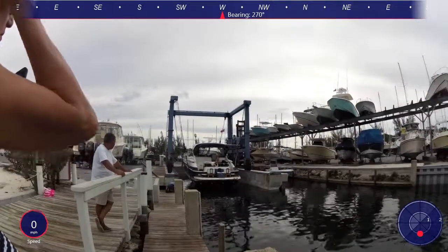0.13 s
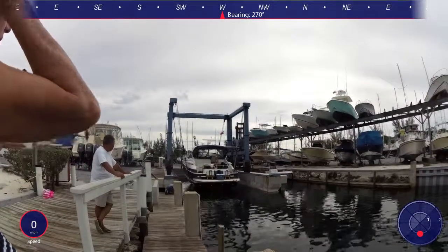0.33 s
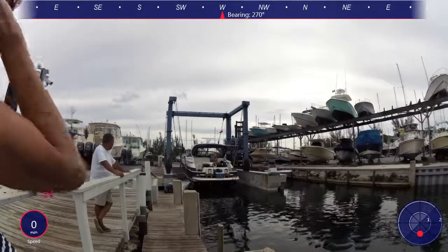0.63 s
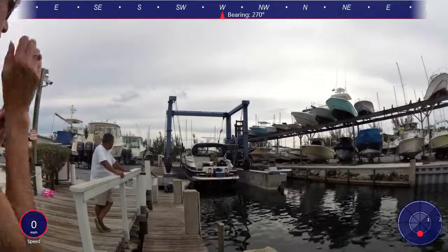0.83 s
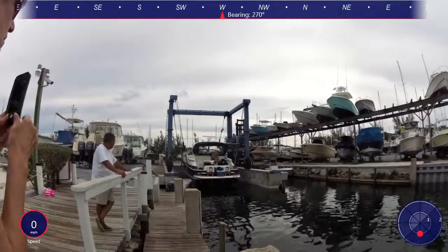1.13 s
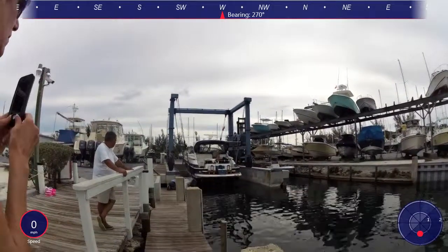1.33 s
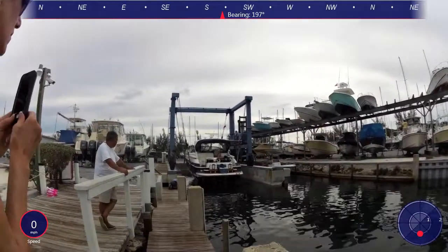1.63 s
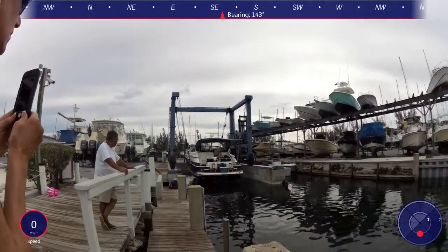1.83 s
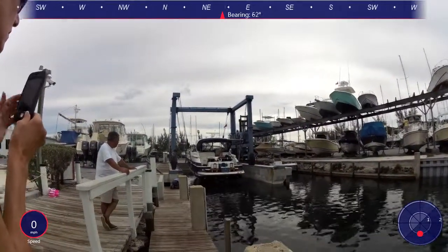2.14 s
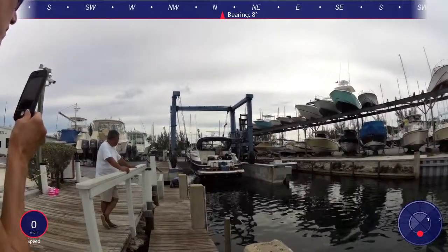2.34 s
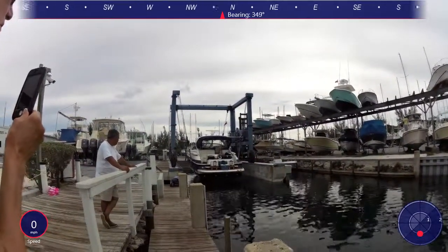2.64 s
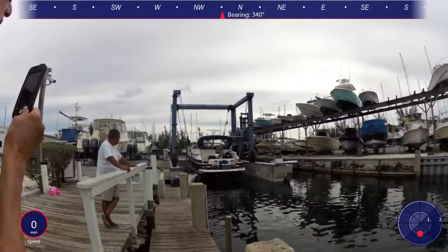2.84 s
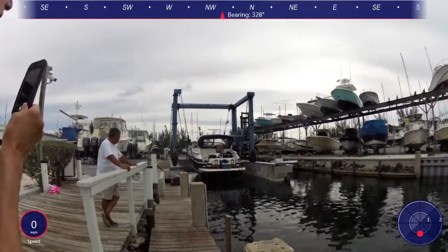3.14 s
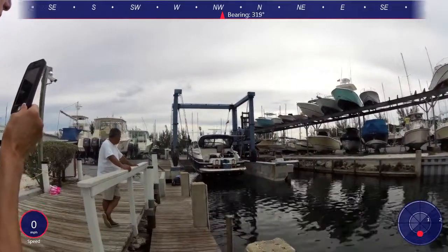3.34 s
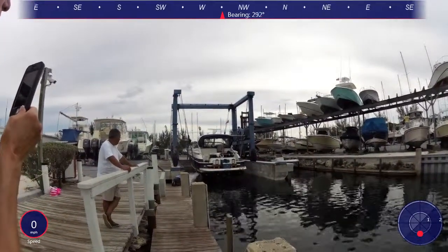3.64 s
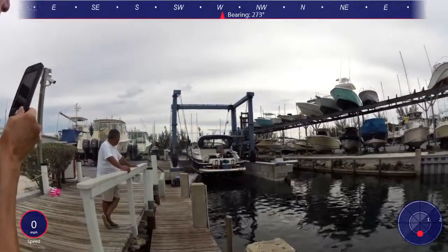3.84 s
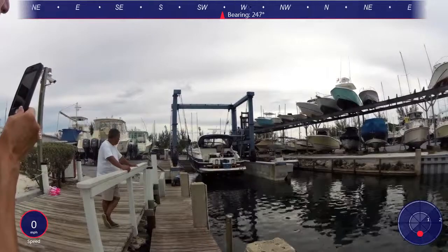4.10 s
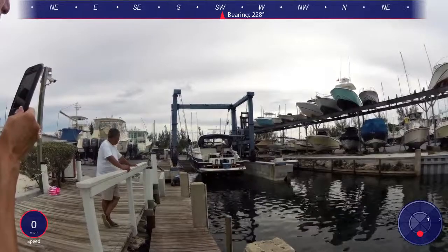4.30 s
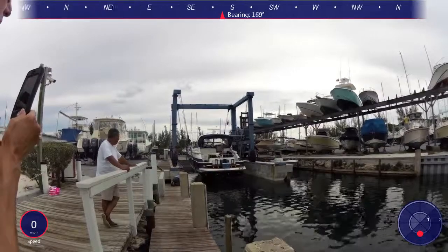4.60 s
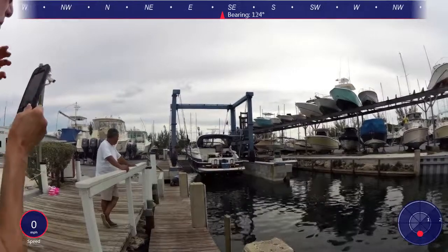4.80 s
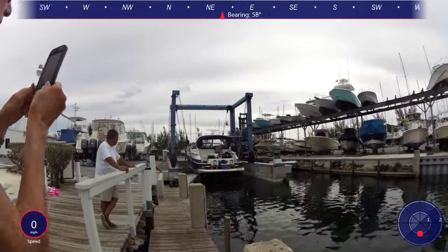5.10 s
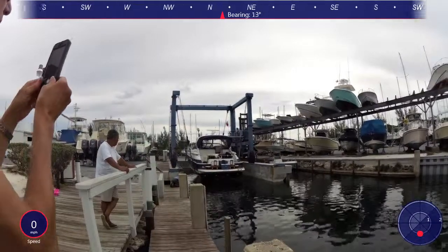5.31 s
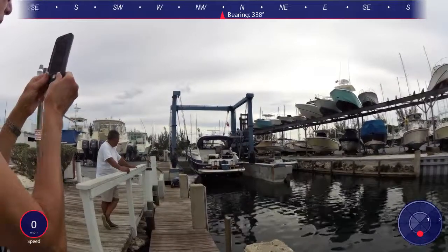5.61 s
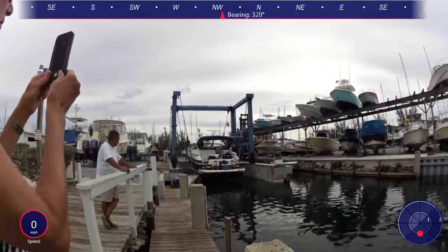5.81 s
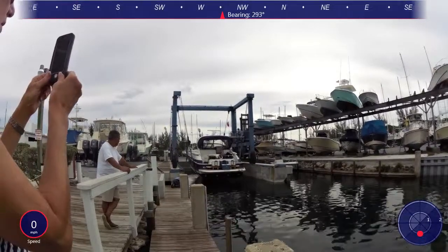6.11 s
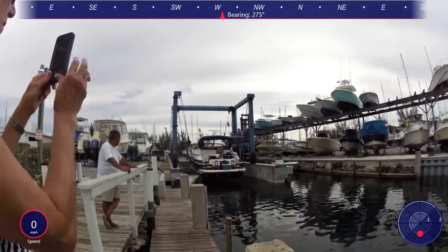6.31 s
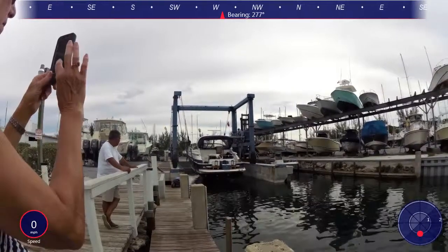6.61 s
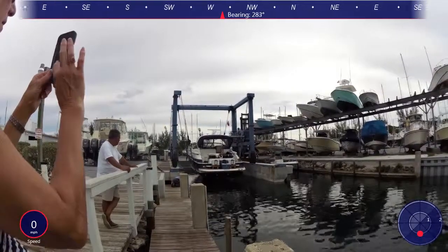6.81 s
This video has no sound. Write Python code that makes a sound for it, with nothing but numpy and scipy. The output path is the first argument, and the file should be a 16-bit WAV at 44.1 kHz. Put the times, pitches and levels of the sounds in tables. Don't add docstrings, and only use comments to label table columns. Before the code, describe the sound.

From 0 to about 7 seconds a boat lift idles continuously in an open boatyard. A four-cylinder diesel gives a low, slightly rough hum, rising gently over the first couple of seconds. Above it a hydraulic pump and its motor whine near 445 and 890 hertz, their close pitches beating slowly, roughly once a second. A broad midrange roar, clatter and quieter hiss pulse faintly with the engine and waver in moving air. Around 1.6 to 2.3 seconds dull frame knocks and panel rattles come through, strongest near 1.9. Near 2.7 the whine's balance shifts subtly. Thin pipe tones swell at 3.2 to 4 and later; the upper whine eases around 4.3. More small knocks fall at 4.4 to 5.8, with a firmer one near 5.8 and another at 6.6. The hiss grows slightly towards the end. Mono, limited bass, softened top, nearly constant level.

```python
import sys
import numpy as np
from scipy import signal
from scipy.fft import rfft, irfft
from scipy.io import wavfile
from scipy.ndimage import uniform_filter1d, map_coordinates

SR = 44100
rng = np.random.default_rng(int(sys.argv[2]) if len(sys.argv) > 2 else 0)


def invert_db(x):
    u = np.asarray(x, float) / 20
    return 10 ** u


def unload_wav(signal):
    wavfile.write(
        sys.argv[1],
        SR,
        np.round(np.clip(np.atleast_2d(signal).T, -1, 1) * 32767).astype(np.int16),
    )


N = 306495
PISTONS = 10
PISTON_HZ = 444.61


def clock():
    return np.arange(N) / SR


def unit(x):
    return x / np.sqrt(np.mean(x ** 2) + 1e-20)


def curves(rows):
    s, *cols = np.transpose(rows)
    return [np.interp(clock(), s, c) for c in cols]


def wobble(rate):
    knots = rng.standard_normal(int(N * rate / SR) + 4)
    return map_coordinates(knots, [np.arange(N) * rate / SR], order=1)


def swells(rows):
    return sum(db * np.exp(-((clock() - s) / half) ** 2) for s, half, db in rows)


def rush(spectrum, cycle, patchy_db, repeat_db):
    z = signal.stft(rng.standard_normal(N + 512), nperseg=512)[2]
    field = uniform_filter1d(rng.standard_normal(z.shape), 6, 0)
    field = uniform_filter1d(field, 10, 1)
    white = signal.istft(z * invert_db(patchy_db * unit(field)), nperseg=512)[1][:N]
    pattern = rng.standard_normal(2000)
    repeated = pattern[(cycle % 1 * len(pattern)).astype(int)]
    white = unit(white) + invert_db(repeat_db) * repeated
    f, db = np.transpose(spectrum)
    hz = np.fft.rfftfreq(N, 1 / SR)
    gain = invert_db(np.interp(np.log(hz + 1), np.log(f), db, right=-120))
    return unit(irfft(rfft(white) * gain, N))


def tone(turns, db, waver_db, drift):
    phase = 2 * np.pi * turns + drift * wobble(7)
    return np.sqrt(2) * invert_db(db + waver_db * wobble(6)) * np.sin(phase)


def frame():
    # start in seconds, peak level in dB.
    frame_knocks = [(1.571, -29), (1.859, -20), (2.172, -31.5), (2.303, -30), (4.781, -35.5),
                    (5.004, -29.5), (5.409, -30), (5.676, -32), (5.836, -25), (6.566, -31), (2.349, -27.5),
                    (4.417, -28), (5.813, -21)]
    panel_rattles = [(0.176, -25), (1.571, -23), (1.863, -26), (2.172, -18.5), (2.304, -22.5),
                     (2.337, -22.5), (2.888, -26), (3.073, -23.5), (3.235, -20.5), (3.595, -26),
                     (3.957, -23), (4.047, -25), (4.09, -27), (4.181, -26), (4.418, -26), (4.45, -24.5),
                     (4.646, -24.5), (4.781, -24), (4.856, -24.5), (5.005, -23.5), (5.087, -27),
                     (5.26, -28), (5.407, -20.5), (5.53, -25.5), (5.754, -22), (6.253, -25.5), (6.34, -23),
                     (6.566, -23), (6.61, -25.5), (6.789, -27)]
    # mode in Hz, level in dB, time to fall 60 dB in seconds.
    frame_modes = [(330, -7.5, 0.033), (439, 3, 0.047), (916, -1, 0.014), (1500, -19, .025)]
    panel_modes = [(754, -1.5, .03), (940, 3.5, 0.023), (1420, -7.5, 0.014), (1650, -3.5, 0.018)]
    blows = [(s, db, frame_modes) for s, db in frame_knocks]
    blows += [(s, db - 10, panel_modes) for s, db in panel_rattles]
    out = np.zeros(N + SR)
    t = np.arange(SR // 5) / SR
    onset = 1 - np.exp(-t / 0.0027)
    for s, db, modes in blows:
        ring = 0
        for hz, mode_db, t60 in modes:
            level = invert_db(mode_db + rng.normal(0, 2.5) - 60 * t / t60)
            ring = ring + level * np.sin(2 * np.pi * hz * t)
        out[round(s * SR):][:len(t)] += invert_db(db) * ring * onset
    return out[:N]


def casing(cycle):
    # frequency in Hz, density in dB per Hz.
    roar_colour = [(25, -59), (55, -39), (100, -20.5), (140, -10.5), (190, -14), (240, -8), (300, -4),
                   (400, -2), (480, -0.5), (560, -8.5), (720, -8), (900, -1), (1020, -10.5), (1150, -15),
                   (1300, -15.5), (1600, -20.5)]
    clatter_colour = [(1100, -29.5), (1300, -4), (1550, 2), (1780, -3.5), (1880, -6), (2400, -8.5),
                      (2800, -13), (3150, -11.5), (3450, -20.5), (3800, -45)]
    hiss_colour = [(2800, -11.5), (3400, -2), (3800, -2), (5300, -3), (5800, -8), (7200, -15),
                   (8500, -13.5), (9200, -31.5), (9800, -30), (11100, -36.5), (12000, -45.5)]
    # middle in seconds, gain in dB.
    valve_gulps = [(.13, 0), (.45, 0.5), (.65, 1), (1.04, 0.5), (1.45, .5), (1.52, 1), (1.85, 3), (2.26, 3),
                   (2.37, 1.5), (2.83, -0.5), (3.0, -1), (3.15, 2.5), (.55, 1.1), (1.18, 0.5), (2.12, 1.1),
                   (2.55, 0.5), (3.65, -0.2), (3.8, 0.3), (4.9, -0.5), (5.75, 1), (6.28, 1), (3.33, 1),
                   (3.9, 0.5), (4.3, -0.5), (4.5, 0), (4.75, 0.5), (5.04, 3), (5.2, -0.5), (5.68, 1.4),
                   (5.84, 2.5), (6.05, -1), (6.15, 1.5), (6.4, 2), (6.55, 2), (6.75, 0.5), (6.94, 2)]
    gulp_s = 0.057
    gulp_db = swells([(s, gulp_s, db) for s, db in valve_gulps])
    late_db = 0.9 * (clock() * SR / N) ** 4
    one_cylinder = np.cos(2 * np.pi * cycle + 1.03)
    firing = np.cos(2 * np.pi * 4 * cycle) + 2.0 * one_cylinder
    stroke = np.cos(2 * np.pi * 2 * PISTONS * cycle)
    gust = 0.47 * wobble(13) + 0.69 * wobble(24)

    roar_db = -39.5 + gulp_db + 0.64 * firing + 1.0 * gust
    clatter_db = -43 + gulp_db + 0.44 * firing + 0.98 * gust
    hiss_db = -61 + 0.76 * gulp_db + late_db + 0.3 * firing + 0.8 * stroke + 0.9 * gust
    roar = invert_db(roar_db) * rush(roar_colour, cycle, patchy_db=1.5, repeat_db=-19.0)
    clatter = invert_db(clatter_db) * rush(clatter_colour, cycle, patchy_db=0.5, repeat_db=-11.5)
    hiss = invert_db(hiss_db) * rush(hiss_colour, cycle, patchy_db=1.5, repeat_db=-8.0)
    return roar + clatter + hiss


def engine(cycle):
    # multiple of the four-stroke cycle, level in dB.
    exhaust_tones = [(3, -73.8), (4, -54.6), (5, -73.3), (6, -57.4), (7, -65.8), (8, -53.8), (9, -59.8),
                     (10, -58.2), (11, -62.8), (12, -58.6), (13, -54.7), (14, -55.9), (15, -61), (17, -61),
                     (18, -50.5), (19, -53.9), (22, -53.6), (23, -60.1), (25, -61.9), (26, -59.0),
                     (29, -60.4), (31, -63.0), (32, -61.6), (33, -57.3), (34, -61.8)]
    high_tones = [(21, -60), (27, -67), (28, -66), (35, -62), (46, -66), (51, -69), (61, -65), (65, -64),
                  (71, -62), (81, -66), (36, -47.4), (37, -56.8), (38, -63), (39, -55.0), (42, -61),
                  (44, -63), (43, -56.2), (45, -56.3), (47, -60.3), (48, -57.7), (49, -58.9), (50, -66.4),
                  (53, -60.6), (56, -64.2), (58, -61.5), (62, -60), (64, -58.5), (66, -63), (68, -61),
                  (73, -64), (76, -64), (70, -54.5), (72, -56), (74, -58), (78, -56.5), (79, -56.3),
                  (82, -62.1),
                  (98, -66.1), (102, -69.1), (104, -67.4), (105, -69.0), (112, -64.6), (116, -68.6),
                  (124, -68.5), (158, -77.9), (162, -81.2), (164, -82.0), (176, -81.7), (184, -81.4)]
    climb_db = 0.5 - 1.5 * np.exp(-clock() / 1.3)
    hum_db = climb_db + 0.46 * wobble(3.3)
    out = np.zeros(N)
    for k, db in exhaust_tones:
        out += tone(k * cycle + rng.random(), db + hum_db, waver_db=0.056 * k, drift=0.02 * k)
    for k, db in high_tones:
        out += tone(k * cycle + rng.random(), db - 0.4, waver_db=1.0, drift=0.25)
    return out


def whistles(stroke):
    # multiple of the piston rate, level in dB.
    pipe_tones = [(3, -48.5), (7, -63), (8, -74.5), (10, -76.5), (12, -74), (13, -82), (9, -81.5),
                  (11, -79.5), (6, -63.5), (14, -87)]
    # pipe index, middle in seconds, half
    # length in seconds, gain in dB.
    pipe_swells = [(0, 0.66, .3, 2), (0, 3.4, 0.099, 4.5), (0, 3.85, 0.16, 7), (0, 4.8, .1, -3),
                   (0, 4.75, .2, 2.5), (0, 4.9, 0.11, 3.5), (0, 3.7, .07, -9), (0, 7.1, 0.087, -9.5),
                   (0, 6.8, .3, -1.5), (1, .25, .25, -4), (1, .7, .12, 5.5), (1, 1.9, .3, -10),
                   (1, 2.75, .13, 2.5), (1, 3.17, 0.13, 7), (1, 3.75, .3, 4.5), (1, 4.7, 0.15, 6),
                   (1, 5.45, .3, 6), (1, 6.5, .4, 3), (1, 7.6, .15, 5), (8, 1.4, .25, -3),
                   (8, 3.6, .25, -8), (8, 3.3, .3, -1), (8, 5.75, 0.42, 8.5), (8, 2.25, .15, 1),
                   (8, 8.7, .15, 7), (2, .03, .12, 10), (2, 1.07, .08, 16), (2, 1.3, .14, 8.5),
                   (2, 2.7, .35, 6.5), (2, 3.1, .1, 6.5), (2, 6.3, .25, 3.5), (2, 6.9, .13, 9.5),
                   (3, 3.6, .4, 10), (3, 4.6, .2, 9), (3, 5.6, .7, 4.5), (3, 6.75, .15, -10),
                   (4, 1.9, .6, 0.5), (4, 3.9, .8, -9.5), (4, 6.75, .4, 5), (5, 2.4, .17, -9),
                   (5, 2.95, .25, 8.5), (5, 3.9, .35, 8), (5, 5.2, .35, -4.5), (5, 5.9, .15, 8),
                   (5, 6.8, .35, 4), (6, .47, .07, 8.5), (6, 5.08, .08, 11), (6, 6.35, .5, 8.5),
                   (7, 5.75, .15, 8), (7, 1.2, .4, 2),
                   (6, .1, .12, 6), (6, 1.1, .05, 6), (6, 1.53, .08, 9), (6, 1.95, .13, 5),
                   (6, 2.2, .07, 7), (6, 6.5, .08, 11), (6, 6.85, .2, 4.5), (7, .18, .1, 7),
                   (7, .55, .12, -4.5), (7, 3.4, .4, -4), (7, 4.92, .09, 9), (7, 5.83, 0.076, 4.5),
                   (7, 6.7, .1, 3.5), (9, 1.42, .17, 9.5), (9, 1.9, .15, 6), (9, 2.5, .35, -5),
                   (9, 3.95, .2, 4.5), (9, 5.35, .15, 10), (9, 5.9, .4, 5.5), (9, 6.8, .35, 9),
                   (3, 1.1, .15, -3), (3, 3.9, .08, -4.5), (3, 2.8, .1, -6), (3, 3.25, .2, 4.5),
                   (0, 4.3, .1, -0.5), (4, 7.1, .3, 3)]
    level = [db + np.zeros(N) for _, db in pipe_tones]
    for pipe, s, half, gain_db in pipe_swells:
        level[round(pipe)] += swells([(s, half, gain_db)])
    return [(round(k) * stroke, db) for (k, _), db in zip(pipe_tones, level)]


def pump(cycle):
    # multiple of the pump's or the motor's stroke rate, level in dB.
    pump_tones = [(4, -61), (5, -64), (15, -90), (16, -94), (17, -90), (18, -94), (19, -93)]
    motor_tones = [(3, -63), (7, -76)]
    # time in seconds, pressure over its mean in dB.
    oil_pressure = [(0, 1.5), (.55, 0.8), (1.0, 1.5), (1.45, 1.5), (1.9, -1), (2.3, 3), (2.7, -2.5),
                    (3.15, -4.5), (3.6, -2), (4.0, 4), (4.4, 3), (4.85, 5.5), (5.3, -1), (5.7, 0),
                    (6.1, -4), (6.5, -5.5), (6.95, -2)]
    # level in dB at mean pressure, dB per dB of pressure, dB gained as the lift settles.
    body_tones = [
        (-45, 0.74, 0.5),
        (-38.5, 0.26, 1.5),
        (-40, 0, -2.5),
        (-46, 0, -0.5),
    ]
    # middle in seconds, half length in seconds, gain in dB.
    motor_eases = [
        (1.35, 0.6, 0.5),
        (2.5, .3, 1),
        (4.3, .55, -10.5),
        (3.5, .1, 0.5),
        (6.7, .12, -4),
        (6.45, .12, -2),
        (6.9, .12, -3.5),
        (0.49, .12, 2.5),
        (5.2, .12, -2.5),
    ]
    slip_hz, slip_start = 1.18, -0.2
    settle_s, settle_span_s = 2.67, 0.5

    stroke = 2 * PISTONS * cycle
    motor = stroke - slip_start - slip_hz * clock()
    pressure_db, = curves(oil_pressure)
    settled = 1 / (1 + np.exp((settle_s - clock()) / settle_span_s * 2))
    levels = [db + law * pressure_db + late_db * settled for db, law, late_db in body_tones]
    levels[-1] = levels[-1] + swells(motor_eases)
    turns = stroke, motor, 2 * stroke - 0.47, 2 * motor - 0.15
    body = sum(tone(u, db, waver_db=0.5, drift=0.11) for u, db in zip(turns, levels))

    upper = [(k * stroke, db) for k, db in pump_tones]
    upper += [(k * motor, db) for k, db in motor_tones]
    upper += whistles(stroke)
    whine = sum(tone(u + rng.random(), db - 0.2, waver_db=1.5, drift=0.28) for u, db in upper)
    uneven = 1 + 0.18 * np.cos(2 * np.pi * 2 * cycle) + 0.049 * np.cos(2 * np.pi * 4 * cycle)
    return body + uneven * whine


def scene():
    # time in seconds, strokes the shaft is ahead of steady running.
    shaft_lead = [(0.0, -0.098), (0.463, -0.078), (0.927, -0.039), (1.39, 0.045), (1.853, 0.087),
                  (2.317, 0.036), (2.78, -0.036), (3.243, -0.015), (3.707, 0.101), (4.17, 0.066),
                  (4.633, 0.015), (5.097, 0.003), (5.56, 0.058), (6.023, -0.002), (6.487, -0.073),
                  (6.95, -0.07)]
    inertia_s = 0.3
    lead = uniform_filter1d(curves(shaft_lead)[0], round(inertia_s * SR))
    cycle = (PISTON_HZ * clock() + lead) / (2 * PISTONS)
    air = invert_db(0.45 * wobble(19) + 0.53 * wobble(8.7))
    mix = frame() + engine(cycle) + air * (casing(cycle) + pump(cycle))
    return mix[None]


def low_pass(x):
    return signal.sosfilt(signal.butter(12, 11970, fs=SR, output="sos"), x)


def record(dry):
    window_s = 0.09
    power = np.abs(uniform_filter1d(dry ** 2, round(window_s * SR), axis=1))
    gain = (power / np.mean(power) + 1e-3) ** -0.22
    return low_pass(dry * gain)


dry = scene()
out = record(dry)
unload_wav(out)
```